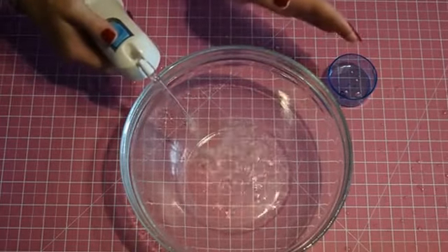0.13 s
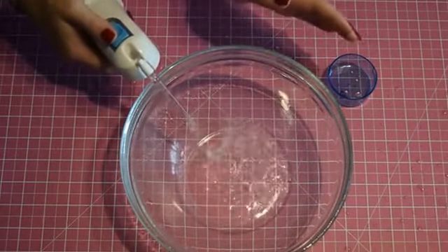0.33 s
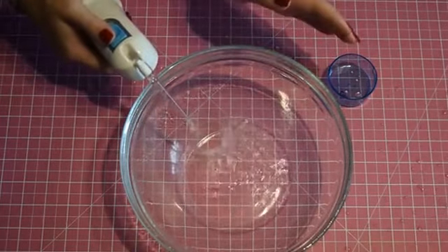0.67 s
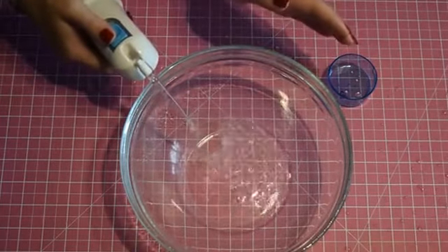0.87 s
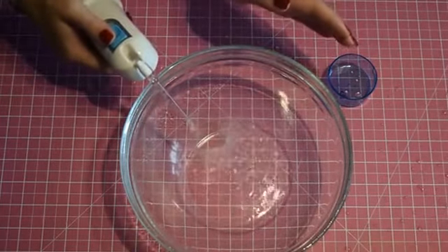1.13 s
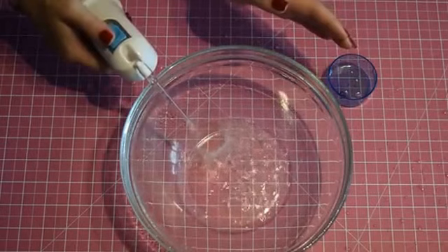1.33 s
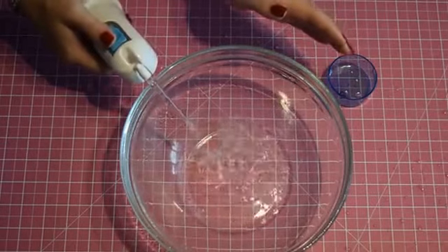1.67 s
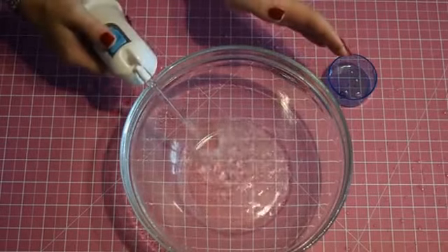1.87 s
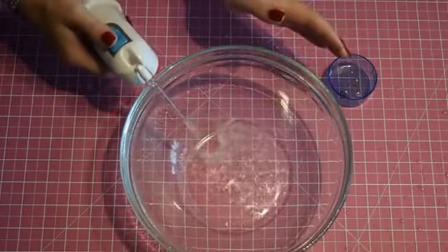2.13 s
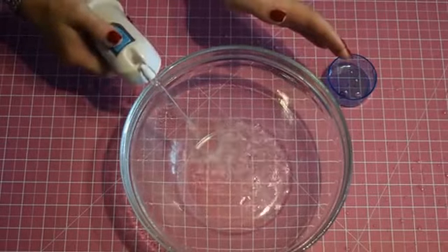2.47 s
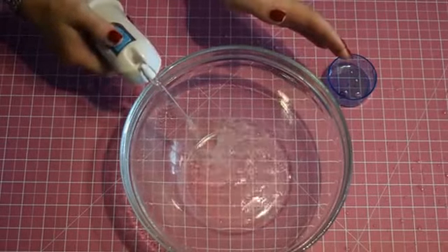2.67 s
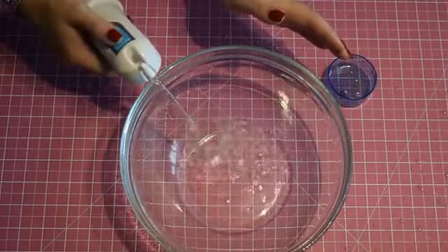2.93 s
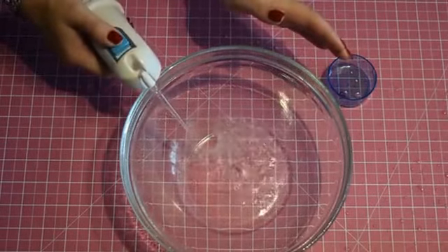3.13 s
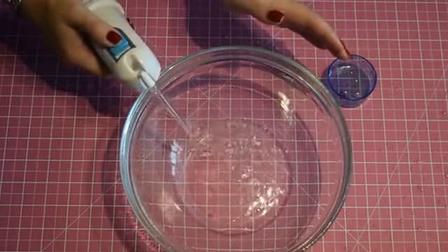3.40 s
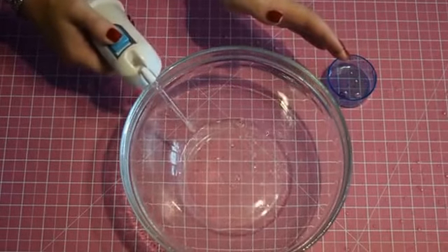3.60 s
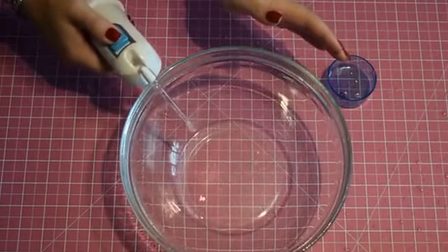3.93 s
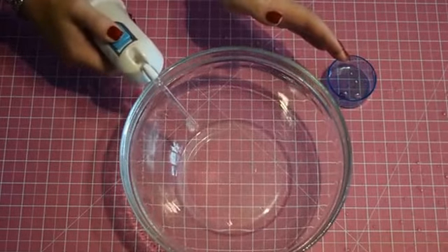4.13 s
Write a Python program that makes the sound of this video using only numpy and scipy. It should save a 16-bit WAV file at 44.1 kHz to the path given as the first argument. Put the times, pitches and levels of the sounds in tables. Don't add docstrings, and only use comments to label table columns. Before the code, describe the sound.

From the first moment a handheld water flosser is running: a hard, buzzy plastic rattle, about 34 pump turns a second with two knocks per turn, strongest in the midrange around 1.5 to 2.5 kHz. A thinner, bright spray hiss pulses with it as the jet enters a glass bowl. The motor hurries and drags subtly; barely audible low table bumps fall near 0.5, 0.7, 1.7, 2.2 and 2.7 s. At 1.9 s the buzz grows slightly harder and the spray yields a little, then both slowly sag. Around 3.3 s a brief brighter whine flares and the machine dies steeply, gone by 3.55 s. A very faint glass hum lingers over quiet room air. At 4.0 s a light plastic scrape and tick lead to a sharp switch snap at 4.07 s, followed by two tiny drips near 4.12 s. Close phone pickup, short room tail.

```python
import sys
import numpy as np
from scipy import signal
from scipy.fft import rfft, irfft, next_fast_len
from scipy.io import wavfile
from scipy.ndimage import uniform_filter1d

SR = 44100
rng = np.random.default_rng(int(sys.argv[2]) if len(sys.argv) > 2 else 0)


def boost(x):
    u = np.asarray(x, float) / 20
    return 10 ** u


def put_to_file(sound):
    columns = np.atleast_2d(sound).T
    safe = np.clip(columns, -1, 1)
    whole_steps = np.round(safe * 32767)
    wavfile.write(sys.argv[1], SR, whole_steps.astype(np.int16))


N = 188571
T = np.arange(N) / SR
SIZE = next_fast_len(N + SR)
HZ = np.maximum(np.arange(SIZE // 2 + 1) * SR / SIZE, 1)


def level(x, db=0):
    return x * boost(db) / np.sqrt(np.mean(x ** 2))


def colour(table, column=1):
    table = np.array(table)
    return boost(np.interp(np.log(HZ), np.log(table[:, 0]), table[:, column]))


def through(x, response):
    return irfft(rfft(x, SIZE) * response, SIZE)[..., :N]


def mode(hz, width_hz):
    return 1j * HZ * width_hz / (hz ** 2 - HZ ** 2 + 1j * HZ * width_hz)


def walk(rate):
    hold = int(SR / rate)
    steps = np.repeat(rng.standard_normal(N // hold + 1), hold)
    return uniform_filter1d(uniform_filter1d(steps, hold), hold)[:N]


def grit(scatter_db):
    return level(rng.standard_normal(N) * boost(scatter_db * rng.exponential(size=N)))


def knock(turns, rise, fall, scatter_db, jitter):
    chance = rng.standard_normal((N // 500, 2))[np.floor(turns + 1).astype(int)]
    since = np.maximum(turns % 1 - .08 - jitter * chance[:, 0], 0)
    return boost(scatter_db * chance[:, 1]) * (1 - np.exp(-since / rise)) * np.exp(-since / fall)


def ring(s, db, hz, t60):
    since = np.maximum(T - s, 0)
    return boost(db) * np.sin(2 * np.pi * hz * since) * boost(-60 * since / t60)


CRANK_HZ, CRANK_START_TURNS = 33.7, -.21
# (middle [s], length [s], gain [turns])
SURGES = [
    (.27, .15, .11),
    (.48, .15, -.09),
    (.76, .3, .29),
    (1.32, .15, .08),
    (1.76, .25, -.21),
    (2.58, .45, -.12),
    (2.98, .35, .15),
]


def crank():
    gained = 0
    for middle, length, turns in SURGES:
        done = np.clip((T - middle) / length + .5, 0, 1)
        gained = gained + turns * done * done * (3 - 2 * done)
    return CRANK_HZ * T + CRANK_START_TURNS + gained


GEAR_DB, JET_DB = -18.5, -23.5
LOADED_S, LOAD_DB, SAG_DB_PER_S = 1.92, 1, 1.36
JET_CHOKE_DB = -1
OFF_S, COAST_S, COAST_DB, STOP_DB_PER_S, STILL_S = 3.331, 0.057, 3.5, 278, 3.56


def effort():
    loaded = np.clip((T - LOADED_S) / 0.041, 0, 1)
    sag = SAG_DB_PER_S * np.clip(T - LOADED_S, 0, OFF_S - LOADED_S)
    coast = COAST_DB * np.clip((T - OFF_S) / COAST_S, 0, 1)
    stop = STOP_DB_PER_S * np.maximum(T - OFF_S - COAST_S, 0)
    halt = np.clip((STILL_S - T) / 0.037, 0, 1)
    drive = boost(LOAD_DB * loaded - sag - coast - stop) * halt
    return drive * boost(GEAR_DB), drive * boost(JET_DB + JET_CHOKE_DB * loaded)


# (frequency [Hz], level [dB per Hz])
GEAR_COLOUR = [(120, -88), (200, -43.5), (402, -34.5), (558, -26), (638, -15), (834, -9), (1140, -13),
               (1610, -3), (1950, -8), (2260, -7), (2620, -6), (3330, -6), (3980, -9.5), (4750, -9),
               (7000, -8), (9100, -13.5), (15400, -120)]
# (frequency [Hz], push [dB], pull [dB])
STROKE_COLOUR = [(700, -3, 1), (1000, -1, -1), (1790, 7, -11), (2170, -13.5, 9.5), (2830, 4.5, 2),
                 (4900, 3, -31)]
CASING_HZ = [738, 836, 1034, 1242, 1340, 1405, 1500, 1587, 1630, 1720, 1847, 2055, 2169, 2265, 2341, 2430,
             2767, 2982, 3050, 3203, 3306, 3608, 3774, 4156, 4390]
# (width [Hz], level [dB])
CASING_MODES = [(28, -18), (42.3, 1), (27.86, -6), (28, 5.5), (28, -13), (30, 3), (35, 6.5), (23.6, 10.5),
                (30, -12), (27.778, 6.5), (25.2, 3), (30.6, 8.5), (30.4, 10), (24.6, 7.5), (24.9, 1),
                (27.3, 6), (30, 1), (36, -3), (32.4, -3), (28, -20), (40, 4.5), (27.6, -5), (28, 5),
                (53, 2.5), (60, 0)]


def gears(turns):
    push = grit(1.3) * knock(turns + .22, rise=.06, fall=.14, scatter_db=1.6, jitter=.02)
    pull = grit(1.3) * knock(turns + .72, rise=.06, fall=.14, scatter_db=1.6, jitter=.02)
    ends = through(push, colour(STROKE_COLOUR)) + through(pull, colour(STROKE_COLOUR, column=2))
    rattle = grit(1.35) * boost(0.18 * walk(16)) + boost(5.5) * ends
    body = boost(1.5) + sum(boost(db) * mode(hz, width) for hz, (width, db) in zip(CASING_HZ, CASING_MODES))
    return level(through(rattle, colour(GEAR_COLOUR) * body))


# (frequency [Hz], width [Hz], level [dB])
SLAM_MODES = [(1587, 90, 0), (2280, 200, -12), (3200, 400, -14), (840, 120, -13)]


def slams(turns):
    blows = sum(knock(turns + at, rise=.0005, fall=.002, scatter_db=2.0, jitter=.02) for at in (.16, .66))
    shell = sum(boost(db) * mode(hz, width) for hz, width, db in SLAM_MODES)
    shell = shell / (1 + (700 / HZ) ** 4)
    return level(through(blows, shell), -6.5)


def rumble():
    return level(through(rng.standard_normal(N), mode(45.7, 7.1) ** 2), -46.5)


# (frequency [Hz], level [dB per Hz])
JET_COLOUR = [(1760, -44.5), (3000, 8), (3150, -8.5), (3410, 5.5), (3950, -21), (4280, -5), (4690, -7.5),
              (5540, -15), (7080, -1.5), (7760, -10.5), (8720, 1), (11700, -6.5), (13000, -16)]
SPIT_HZ, SPIT_WIDTH_HZ = 8550, 1000


def jet(turns):
    flow = 0.5 + 1.2 * knock(turns + 0.16, rise=0.049, fall=1.0, scatter_db=0.0, jitter=0.076)
    spray = grit(2.43) * flow * boost(0.41 * walk(12.05))
    hiss = level(through(spray, colour(JET_COLOUR)))
    spit = grit(3.0) * knock(turns + .19, rise=.01, fall=.05, scatter_db=3.3, jitter=.03)
    whistle = level(through(spit, mode(SPIT_HZ, SPIT_WIDTH_HZ) ** 2), -7)
    return hiss + whistle


# (frequency [Hz], width [Hz], level [dB])
UNLOAD_MODES = [(1850, 30, -33), (2100, 60, -37), (3800, 500, -31), (420, 250, -55)]
UNLOAD_S = (3.26, 3.33, 3.39, 3.54)


def unload():
    whine = sum(level(through(rng.standard_normal(N), mode(hz, width)), db) for hz, width, db in UNLOAD_MODES)
    return whine * np.interp(T, UNLOAD_S, (0, 1, 1, 0)) ** 2


# (time [s], peak level [dB], body share [0-1])
SWITCH = [
    (3.9885, -34, .01),
    (3.994, -38, .01),
    (4.0337, -41, .4),
    (4.054, -48, .5),
    (4.0657, -14, .02),
    (4.0677, -11, .15),
    (4.0697, -18, .08),
    (4.0715, -21, .05),
]
# (frequency [Hz], level [dB per Hz])
SNAP_COLOUR = [(350, -51), (600, -30), (1060, -4), (1530, -7.5), (2830, -5), (3260, -11), (5420, 1.5),
               (6260, -3), (7410, 4), (8020, -1), (9620, -1.5), (11900, -10), (13500, -24), (13800, -63)]
# (time [s], peak level [dB], frequency [Hz], t60 [s])
TICK = (4.0337, -38, 2100, .005)


def switch():
    bursts = sum(boost(db) * (T > s) * np.exp(-np.abs(T - s) / .001) for s, db, _ in SWITCH)
    cracks = through(rng.standard_normal(N) * bursts, colour(SNAP_COLOUR))
    handle = sum(body * ring(s, db, 950, 0.032) for s, db, body in SWITCH)
    return cracks * boost(-8.5) / np.abs(cracks).max() + handle + ring(*TICK)


# (time [s], frequency [Hz], level [dB], t60 [s])
BOWL_HUM = [
    (3.402, 1238, -60, 2.2),
    (3.4, 2250, -61.5, 0.46),
]
# (time [s], peak level [dB], frequency [Hz], t60 [s])
DRIPS = [
    (4.1195, -36, 1380, 0.031),
    (4.132, -36, 1510, 0.015),
]


def bowl():
    hum = sum(ring(s, db, hz, t60) for s, hz, db, t60 in BOWL_HUM)
    return hum + sum(ring(*drip) for drip in DRIPS)


# (time [s], peak level [dB])
BUMPS = [
    (0.479, -44),
    (0.687, -53),
    (1.693, -54),
    (2.214, -51),
    (2.708, -51),
]


def bumps():
    return sum(ring(s, db, hz=97, t60=0.062) for s, db in BUMPS)


ROOM_T60_S, TREBLE_T60_S = 0.45, 0.17
# (frequency [Hz], side minus mid [dB])
WIDTH = [(60, -7.5), (110, -10.5), (200, -23), (360, -12.5), (660, -21), (1190, -26.5), (2170, -21),
         (3950, -34), (7190, -17), (13100, -3.5)]


def room(x, wet_db):
    age = np.maximum(T - .004, 0)
    noise = rng.standard_normal((2, N))
    low = through(noise, 1 / (1 + (HZ / 4000) ** 2))
    tail = low * boost(-60 * age / ROOM_T60_S) + (noise - low) * boost(-60 * age / TREBLE_T60_S)
    mid, side = (through(x, rfft(level(v * (age > 0)) / np.sqrt(N), SIZE)) for v in tail)
    mid = x + boost(wet_db) * mid
    side = through(side, colour(WIDTH)) * boost(1.5)
    return np.array([mid + side, mid - side])


# (frequency [Hz], level [dB per Hz])
QUIET_COLOUR = [(18, -37), (30, 3), (43, -11), (121, -6.5), (218, -8), (235, -21), (267, -9.5), (381, -8),
                (478, -8), (795, -1.5), (1260, 0), (1390, -3.5), (1930, -1.5), (3130, -9.5), (13000, -20)]


def quiet():
    mid, side = through(rng.standard_normal((2, N)), colour(QUIET_COLOUR)) * boost(0.86 * walk(24))
    return level(np.array([mid + 0.49 * side, mid - 0.36 * side]), -54.5)


# (frequency [Hz], rarity [spreads of chance])
PATCHES = [(60, 3), (85, -.6), (175, -.6), (230, 3), (3300, 2.6), (4400, .8), (7200, .4), (7650, 0),
           (8100, .8), (9600, .6), (10350, -.3), (10900, .5), (11850, -.3), (12200, .5), (12650, .5),
           (12850, -1.5), (13500, -3)]
# (frequency [Hz], exponent [1])
SPARSE = [(2500, 0), (5000, .7), (8000, 1.1), (13000, 1)]


def shimmer(x, hole_db):
    hz, _, cells = signal.stft(x, SR, nperseg=1024)
    field = rng.standard_normal(cells.shape[1:])
    field = uniform_filter1d(uniform_filter1d(field, size=5, axis=0), size=5, axis=1)
    power = (np.abs(cells) ** 2).sum(axis=(0, 1)) + 1e-18
    sudden = 7 * np.maximum(np.log10(power / uniform_filter1d(power, size=15)), 0)
    rare = np.interp(hz, *np.transpose(PATCHES))[:, None] + sudden
    holes = np.clip(4 * (field / field.std() - rare), 0, 1)
    size = np.abs(cells).mean(axis=0) + 1e-12
    exponent = np.interp(hz, *np.transpose(SPARSE))[:, None]
    lines = (size / uniform_filter1d(size, size=9, axis=0)) ** exponent
    before = uniform_filter1d(size ** 2, size=9, axis=0)
    after = uniform_filter1d((size * lines) ** 2, size=9, axis=0)
    lines = lines * np.sqrt(before / after)
    return signal.istft(cells * lines * boost(-hole_db * holes), SR, nperseg=1024)[1][:, :N]


ROOM_DB, SWITCH_ROOM_DB = -14, -6.5


def scene():
    turns = crank()
    gear_gain, jet_gain = effort()
    machine = gear_gain * (gears(turns) + slams(turns) + rumble())
    flosser = boost(-2.0) * (machine + jet_gain * jet(turns))
    return room(flosser + unload(), ROOM_DB) + room(switch() + bowl(), SWITCH_ROOM_DB) + quiet()


def top_cut(x):
    return signal.sosfilt(signal.butter(12, 13670, fs=SR, output="sos"), x)


def record(dry):
    phone = shimmer(np.tanh(dry), hole_db=45) + bumps()
    offset = -0.0027
    return top_cut(phone + offset)


dry = scene()
out = record(dry)
put_to_file(out)
```